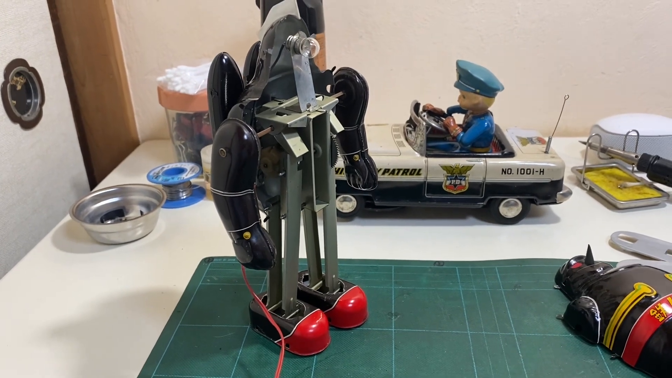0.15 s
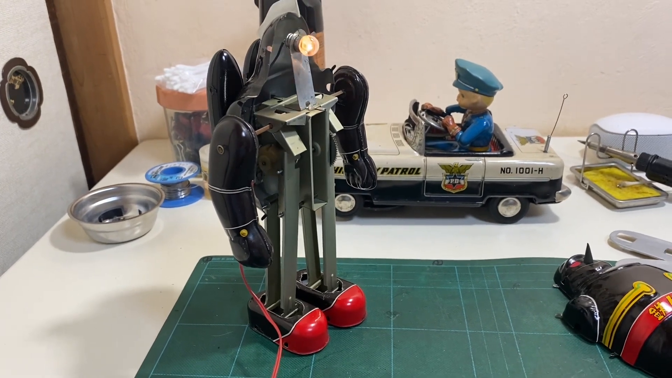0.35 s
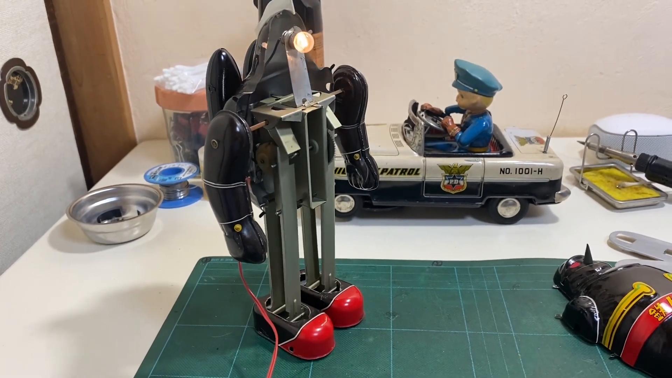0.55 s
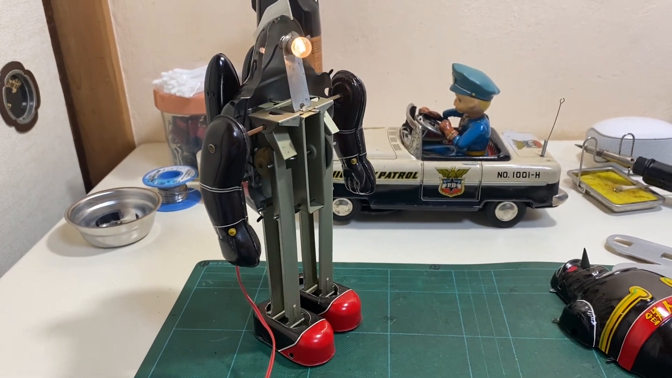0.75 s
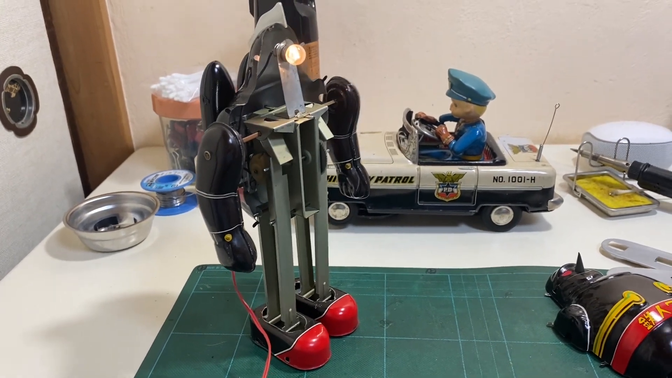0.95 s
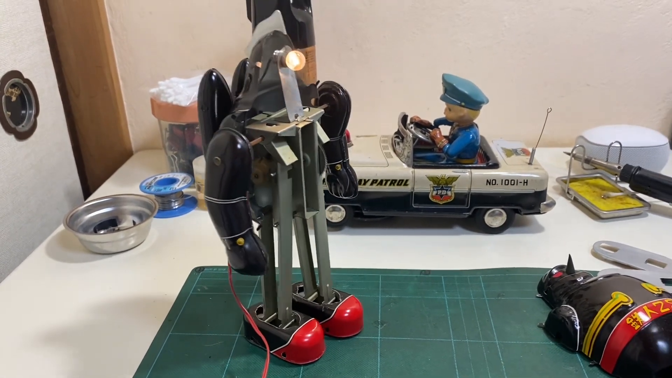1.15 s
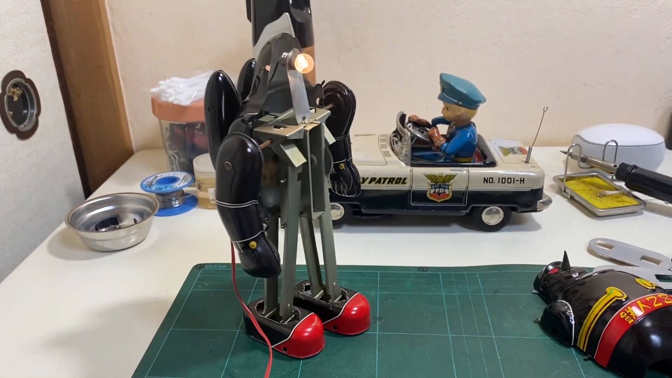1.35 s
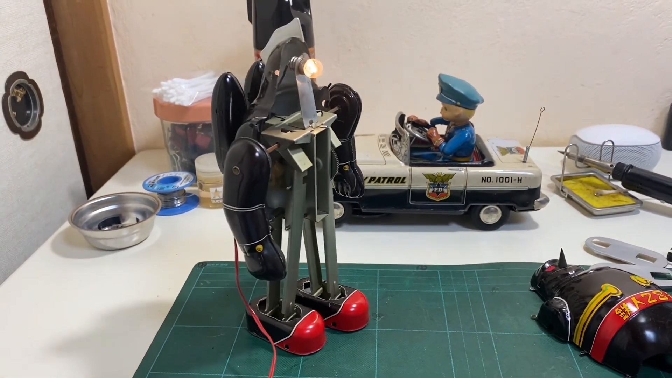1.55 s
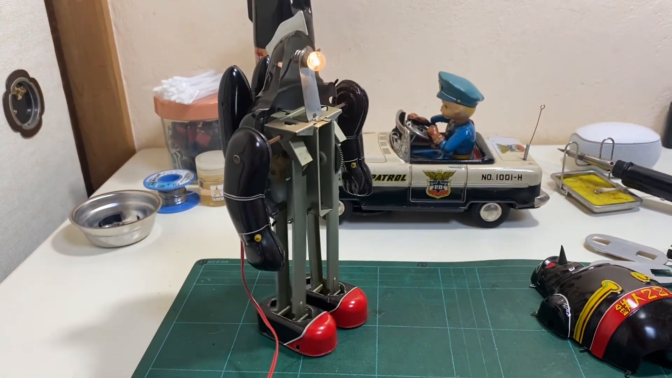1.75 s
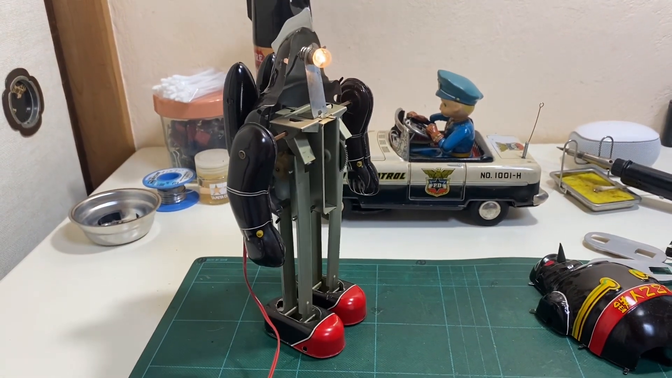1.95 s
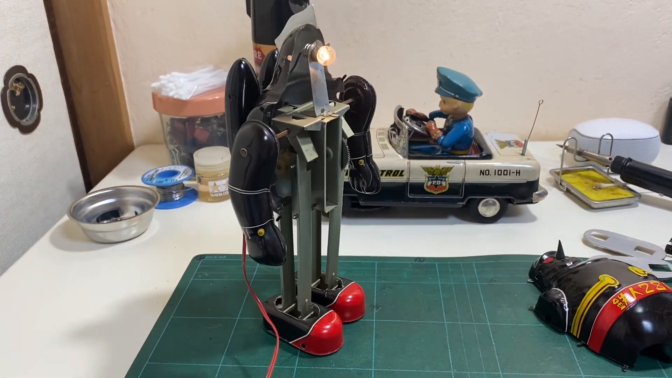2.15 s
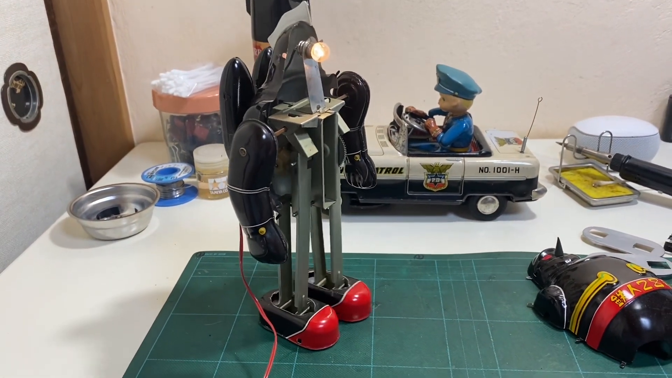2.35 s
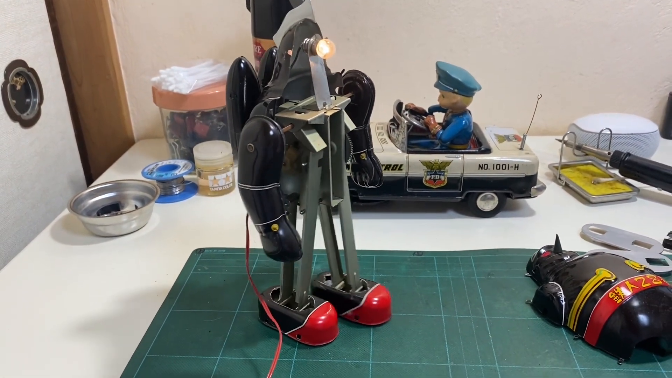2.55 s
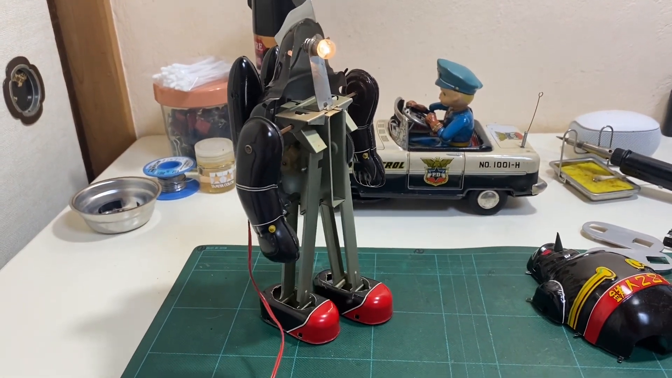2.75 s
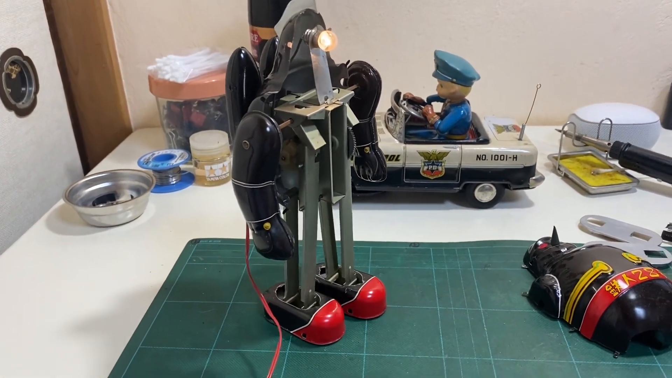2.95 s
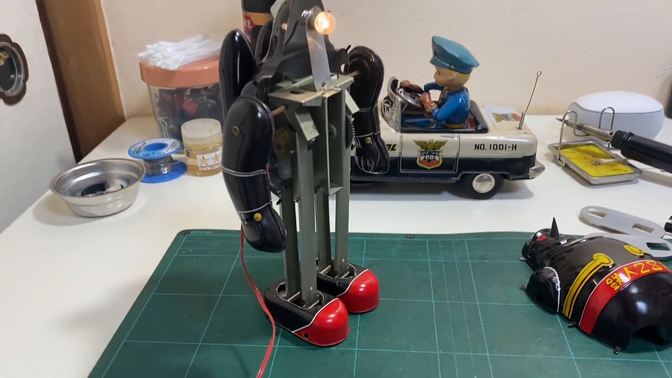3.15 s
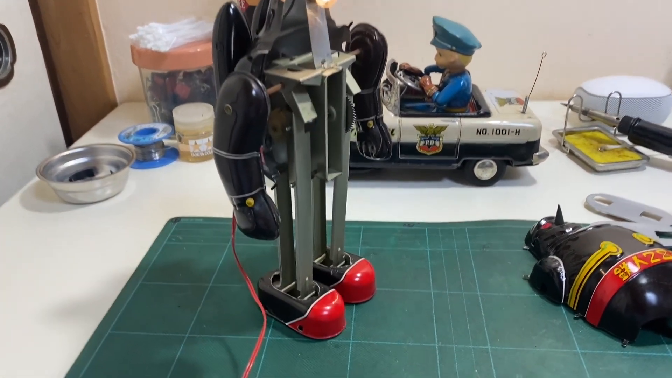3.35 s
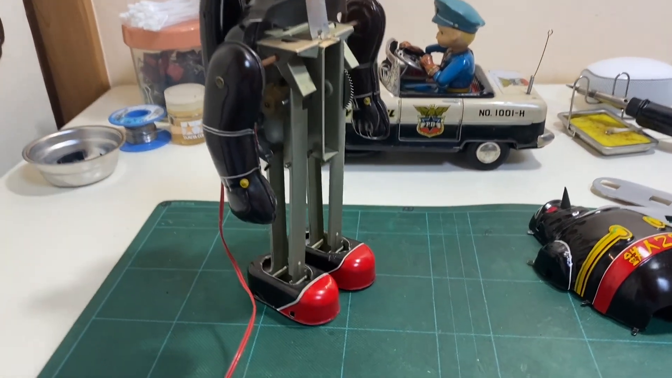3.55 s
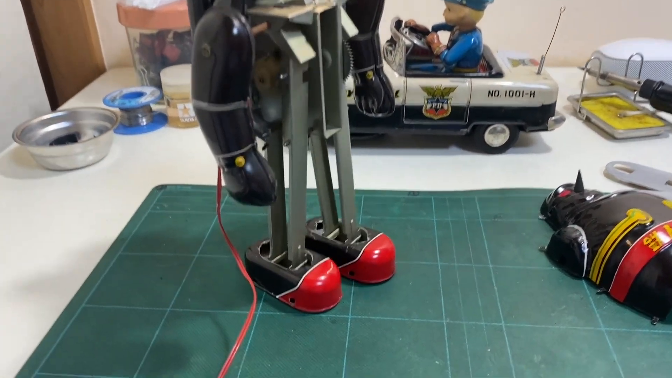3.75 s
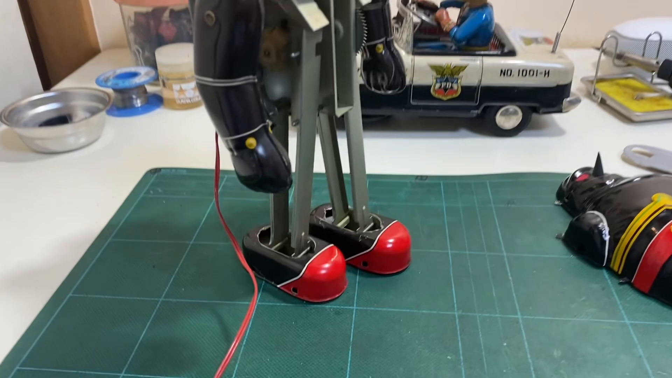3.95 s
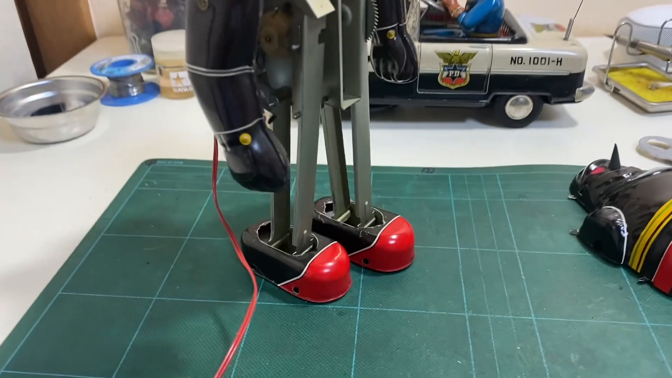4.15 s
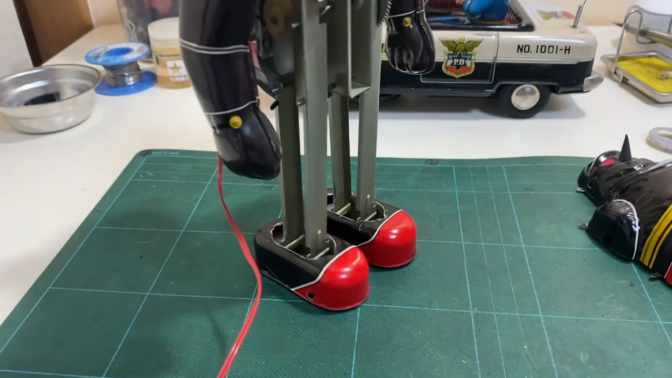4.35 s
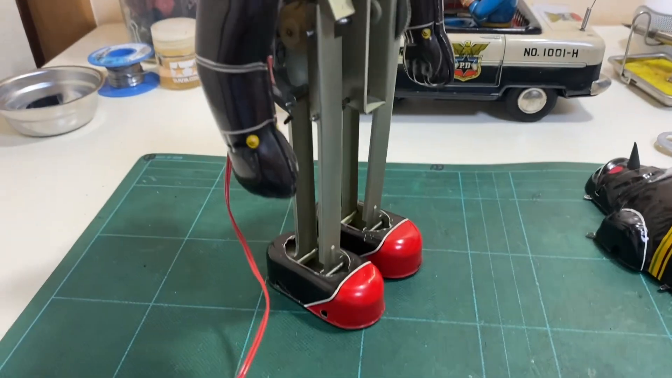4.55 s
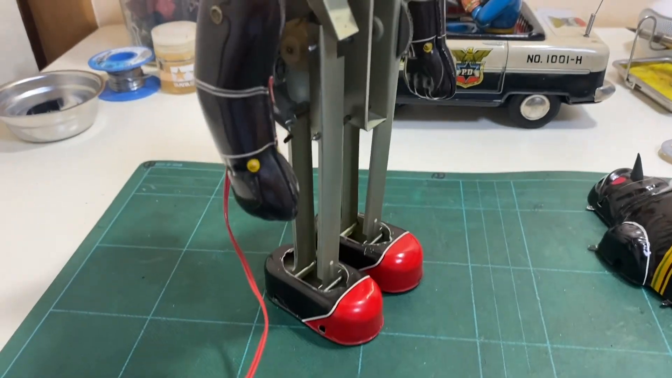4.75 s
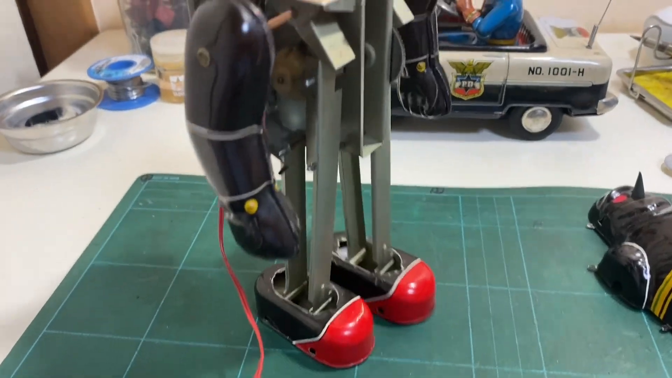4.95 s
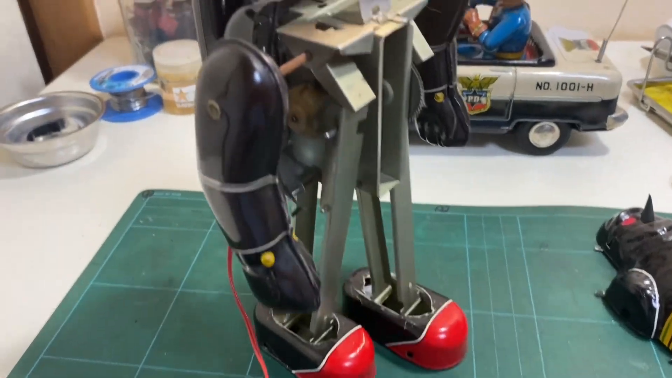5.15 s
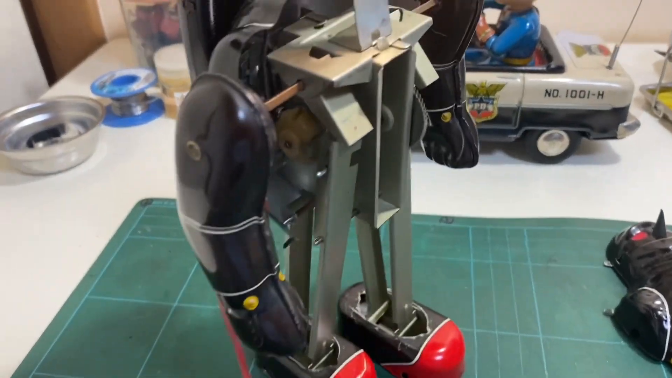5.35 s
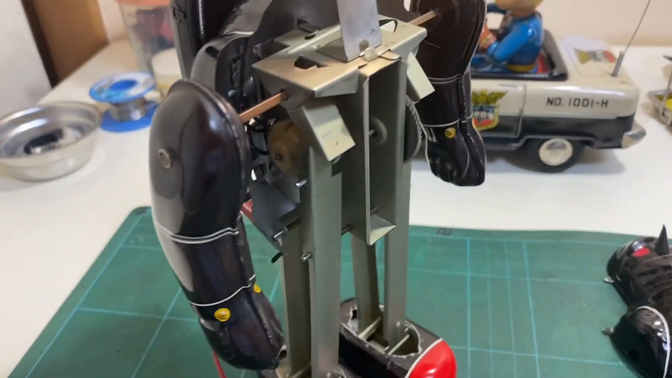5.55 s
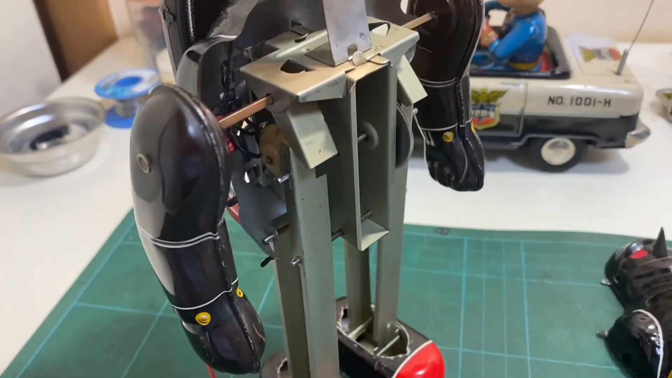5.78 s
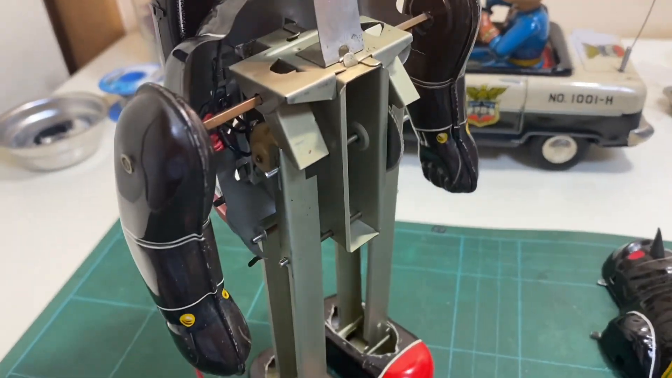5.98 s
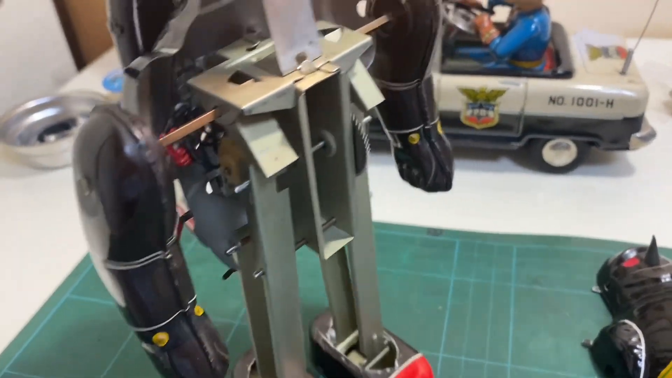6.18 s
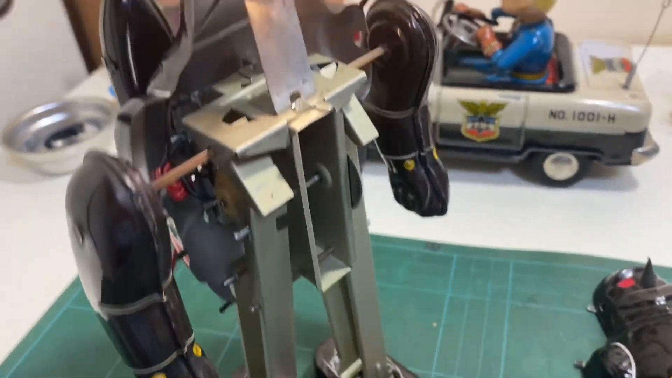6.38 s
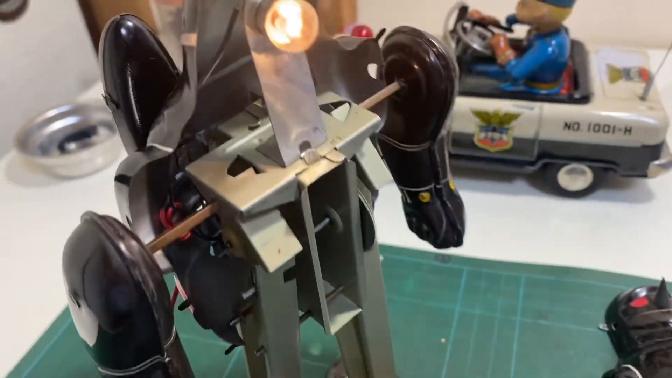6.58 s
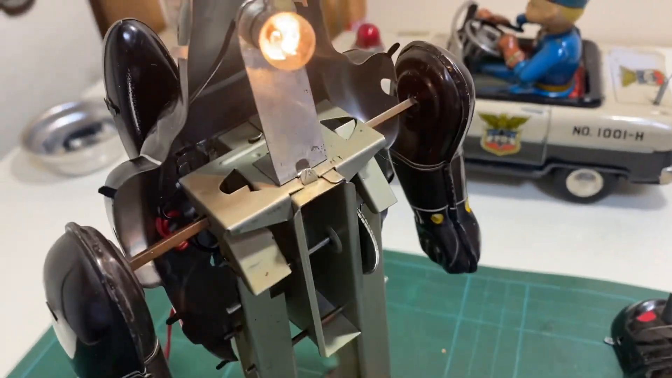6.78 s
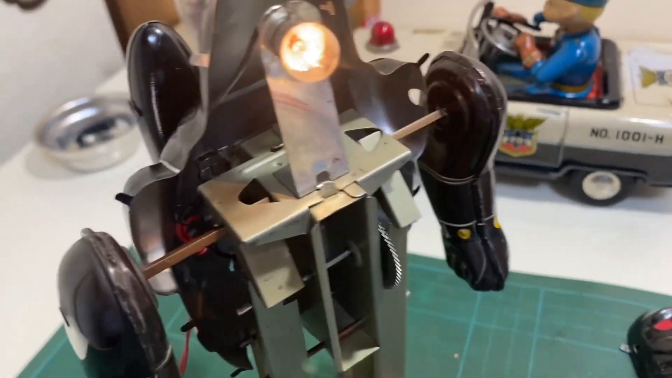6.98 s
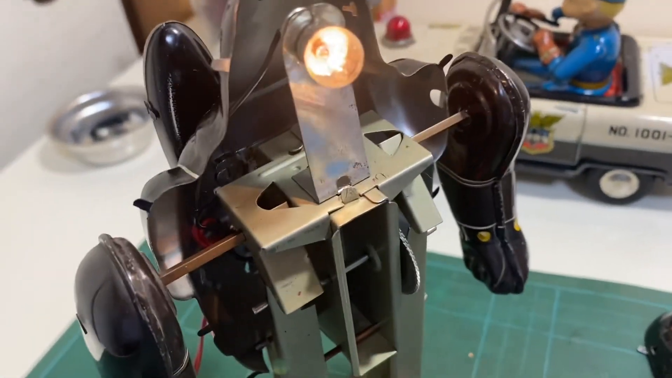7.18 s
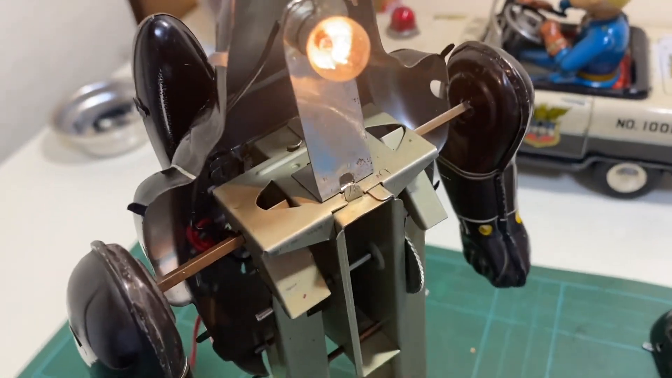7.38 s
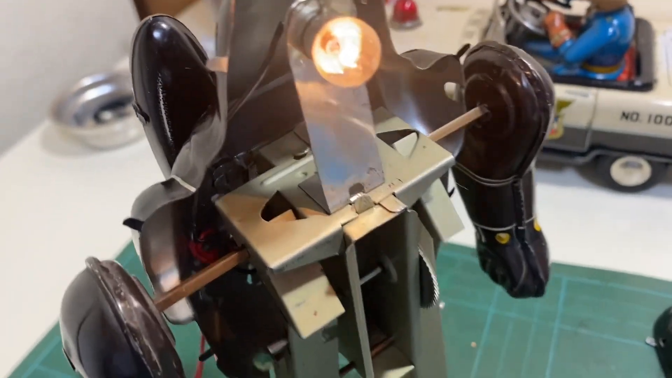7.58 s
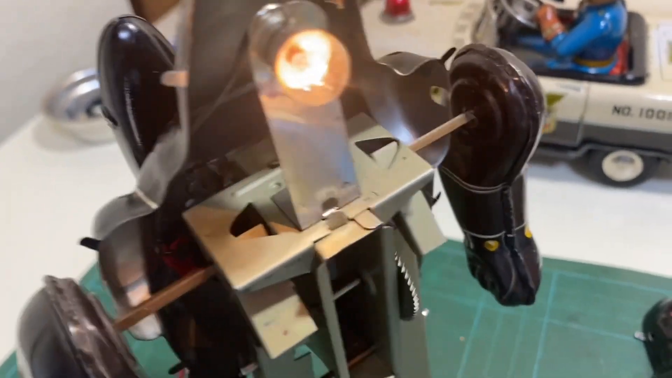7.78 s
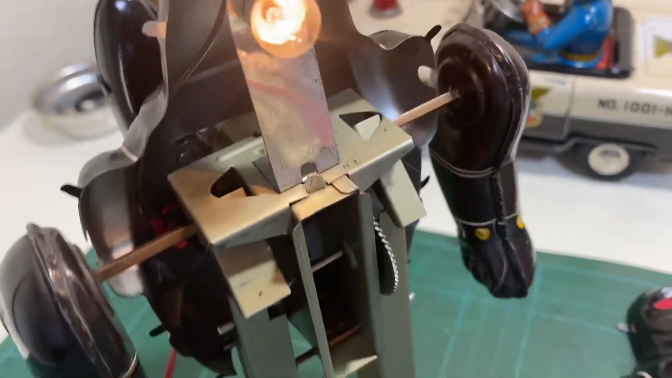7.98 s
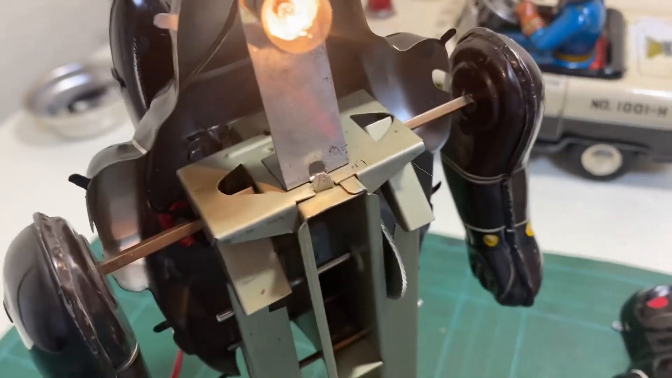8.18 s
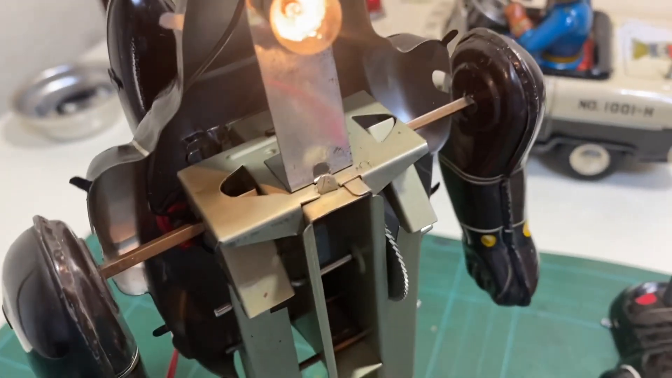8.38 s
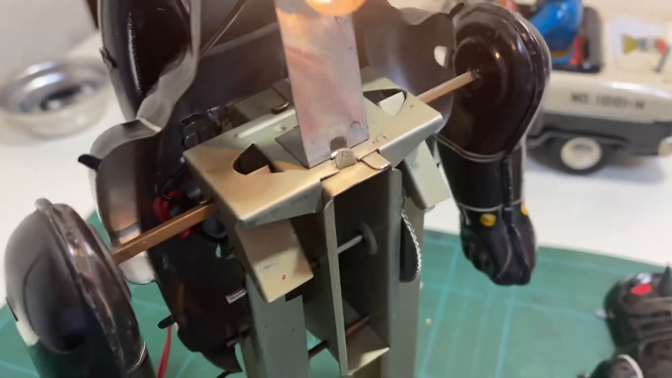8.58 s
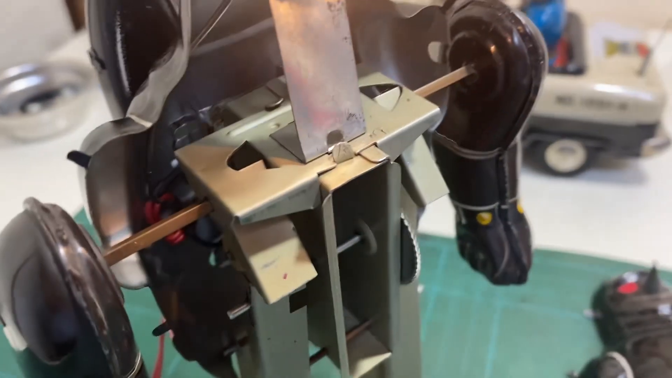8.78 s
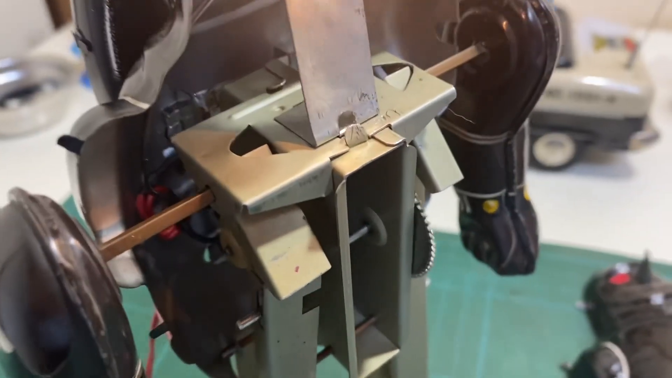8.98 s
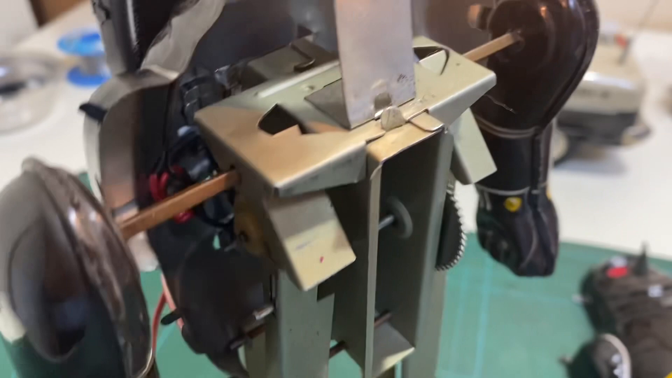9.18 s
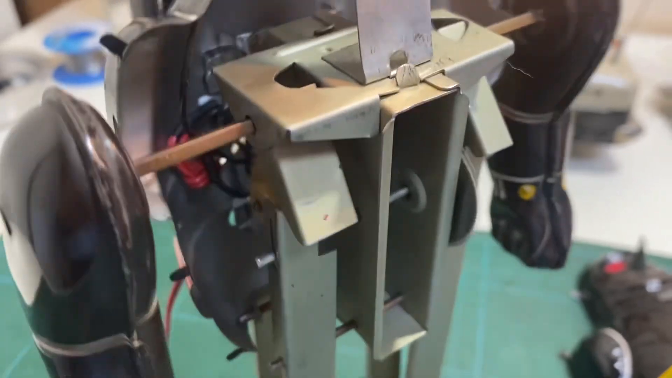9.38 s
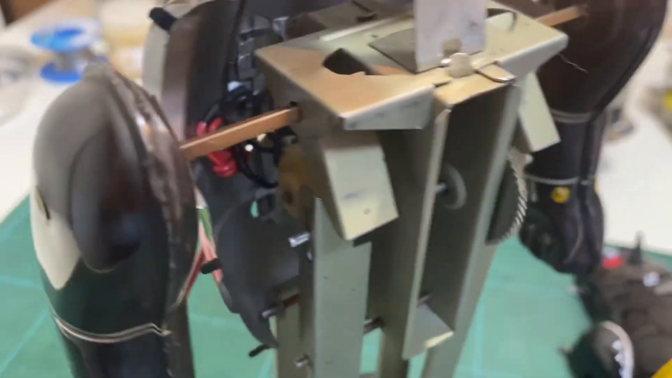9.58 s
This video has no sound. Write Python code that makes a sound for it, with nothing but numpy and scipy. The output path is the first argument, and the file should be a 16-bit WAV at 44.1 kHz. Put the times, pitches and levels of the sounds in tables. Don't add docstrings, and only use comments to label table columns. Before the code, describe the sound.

In a quiet room, a small switch clicks and a tin walking toy starts almost at once. A dense, bright gear rattle runs without pause, pulsing quickly several times a second, with irregular harder knocks and a faint thin metallic ring. A hand-held stereo phone moves nearer, so the chatter grows louder and crisper, over low handling rumble.

```python
import sys
import numpy as np
from scipy import signal
from scipy.fft import rfft, irfft, next_fast_len
from scipy.io import wavfile
from scipy.ndimage import uniform_filter1d

SR = 44100
rng = np.random.default_rng(int(sys.argv[2]) if len(sys.argv) > 2 else 0)


def transcribe(signal):
    frames = np.atleast_2d(signal).T
    limited = np.clip(frames, -1, 1)
    pcm = np.round(limited * 32767).astype(np.int16)
    wavfile.write(sys.argv[1], SR, pcm)


def volts(x):
    e = np.asarray(x, float) / 20
    return 10 ** e


N = 424683


# (time [s], treble excess [dB], plate level over the chatter [dB])
NEARNESS = [(.2, -23, -11), (.3, -6.5, -18), (.45, 0.5, -22), (2, 1, -19.5), (3, -1, -17.5), (4, 0, -21),
            (4.6, .5, -15), (5.8, 1.5, -11), (7, 1, -13.5), (8.2, 0, -13.5), (9.63, 2, -12.5)]


def chatter():
    turn = np.cumsum(motor_hz()) / SR
    slack_pole = np.exp(-2 * np.pi * 60 / SR)
    slack = evened(signal.lfilter([1], [1, -slack_pole], rng.standard_normal(N)))
    beat_db = 3.6 * np.cos(np.pi * turn) ** 4 + 1.15 * np.cos(2 * np.pi * teeth()) + 1.94 * slack

    contacts_per_s = 7000
    struck = rng.random(N) < contacts_per_s / SR
    size = volts(1.6 * np.minimum(rng.exponential(1, N), 4)) * struck
    contacts = evened(size) * rng.choice([-1., 1.], (3, N))
    rub = 0.57 * rng.standard_normal((3, N))
    running = np.arange(N) > LOAD[0][0] * SR
    gears = evened((contacts + rub) * volts(beat_db)) * running

    treble_db = curves(NEARNESS)[0] + 0.65 * np.clip(surge_db(), -8, 8)
    return brightened(gears * volts(load_db() + 0.01), treble_db)


# (time [s], level [dB])
LOAD = [(.19, -87), (.222, -56), (.236, -44.5), (.29, -47), (.315, -38.5), (1, -34), (2, -36), (3, -36),
        (3.8, -35), (4.3, -33.5), (5, -32.5), (6, -33), (6.5, -31.5), (7.2, -31.5), (7.8, -30.5),
        (8.5, -29.5), (9.1, -28.5), (9.63, -31)]
# (time [s], extra level [dB], length [s])
HEAVES = [(0.382, 5.0, 0.097), (0.563, 7, 0.056), (0.704, 3.5, 0.082), (0.939, 2, 0.035), (1.641, 4, 0.1),
          (1.814, 4.5, 0.067), (1.972, 3, 0.022), (2.544, 2, 0.033), (2.694, 3.0, 0.092),
          (2.869, 4.5, 0.051), (3.046, 5, 0.066), (3.214, 4.5, 0.055), (3.621, 3.5, 0.095),
          (3.753, 3, 0.058), (4.124, 2.5, 0.11), (4.283, 5.5, 0.064), (4.445, 4, 0.054),
          (5.327, 3.5, 0.084), (5.503, 4.7, 0.064), (5.684, 4, 0.088), (5.971, 1.5, 0.036),
          (6.056, 2, 0.072), (6.735, 3.5, 0.063), (6.876, 6.5, 0.052), (7.759, 3.3, 0.101),
          (7.914, 5.5, 0.074), (8.097, 5, 0.071), (9.136, 2.5, 0.076), (9.289, 2.5, 0.089),
          (9.471, 2.5, 0.069)]
CRANK_DB = 0.96


def load_db():
    return curves(LOAD)[0] + CRANK_DB * np.cos(2 * np.pi * crank()) + humps(HEAVES)


def surge_db():
    db = load_db()
    return db - uniform_filter1d(db, size=SR // 3)


CRANK_S, CRANK_HZ, CRANK_GAIN_HZ_PER_S = .395, 5.608, .026


def crank():
    t = np.arange(N) / SR - CRANK_S
    return CRANK_HZ * t + CRANK_GAIN_HZ_PER_S * t ** 2 / 2


TEETH_PER_CRANK, TOOTH_PHASE, MOTOR_PER_CRANK = 6, -.33, 31.7


def teeth():
    return TEETH_PER_CRANK * crank() + TOOTH_PHASE


SAG_PER_DB = .004
SPIN_UP_S = .09


def motor_hz():
    since = np.maximum(np.arange(N) / SR - LOAD[0][0], 0)
    geared_hz = MOTOR_PER_CRANK * np.gradient(crank()) * SR
    spin_up = 1 - np.exp(-since / SPIN_UP_S)
    sag = 1 - SAG_PER_DB * np.clip(surge_db(), -6, 6)
    return geared_hz * spin_up * sag


# (time [s], peak level [dB], treble excess [dB])
KNOCKS = [(0.3824, -10, -11), (0.5155, -18, -4), (0.6898, -15, -6), (0.9266, -16, -16), (1.0942, -11, -12),
          (1.7903, -12, -7), (1.9643, -14, -9), (2.5292, -12.5, -13), (2.8539, -14, -14), (3.208, -15, -16),
          (3.5598, -14.5, -5.5), (3.9389, -13.5, -12), (4.434, -11.5, -7), (4.8194, -14.5, -8),
          (4.997, -12.5, -12), (5.3123, -5.5, -15), (5.6625, -11, -12), (6.3876, -14.5, -6),
          (6.6982, -9, -9), (6.8673, -6.5, -8.5), (7.2474, -17, -16), (7.9044, -12, -9), (8.077, -9.5, -10),
          (8.4352, -17, -14), (8.9361, -13, -16), (9.0004, -10, -13), (9.1067, -8, -10), (9.269, -11, -17),
          (9.424, -12, -11), (9.5342, -16, -14)]


def knocks():
    rows = KNOCKS + loose()
    out = np.zeros((3, N))
    t = np.arange(900) / SR
    envelope = (1 - np.exp(-t / .0018)) ** 2 * np.exp(-t / 0.0022)
    bursts = rng.standard_normal((len(rows), 3, len(t))) * envelope
    bursts /= np.linalg.norm(bursts, axis=2, keepdims=True)
    for (s, db, treble_db), burst in zip(rows, bursts):
        at = round(s * SR) - 40
        knock = volts(db + 6.5) * brightened(burst, 0.85 * (treble_db + 17.0))
        out[:, at:at + len(t)] += knock[:, :N - at]
    light_parts = signal.butter(N=1, Wn=900., btype="high", fs=SR, output="sos")
    return signal.sosfilt(light_parts, out)


LOOSE_SHARE, LOOSE_SCATTER_S = .75, .008
LOOSE_DB, LOOSE_SPREAD_DB = 12, 2.5
LOOSE_TREBLE_DB, LOOSE_TREBLE_SPREAD_DB = -12, 4


def loose():
    at = np.searchsorted(teeth(), np.arange(3, 315))
    luck = rng.random(len(at))
    late, size, edge = rng.standard_normal((len(at), 3)).T
    s = at / SR + LOOSE_SCATTER_S * late
    db = load_db()[np.minimum(at, N - 1)] + LOOSE_DB + LOOSE_SPREAD_DB * np.clip(size, -2, 1)
    treble_db = LOOSE_TREBLE_DB + LOOSE_TREBLE_SPREAD_DB * edge
    rows = np.transpose([s, db, treble_db])
    return [*rows[(luck < LOOSE_SHARE) & (at < N - 1000)]]


# (frequency [Hz], width [Hz], level from far, nearer, low beside,
# close above [dB])
TIN = [(375, 108, -11, -12, -16, -9), (527, 68, -11, -9.5, -9.5, -9), (678, 81, -11, -16, -20, -16.5),
       (1085, 115, -9, -5.5, -8, -31), (1220, 61, -3, -1.5, -24, -8), (1546, 96, -8, -9, 3.5, 0),
       (1673, 84, 0.5, 0, 4.5, 3.5), (2055, 130, 4, 3.5, 8, 2.5), (2304, 150, 4, 2.5, -3, -8),
       (2592, 350, 7.5, 6, 5, 2), (3065, 113, 6.5, 0.5, 1.5, 0.5), (3328, 280, 7, 3, 1, 2.5),
       (3690, 150, -10, -4, 3, -9),
       (4048, 420, -0.5, 1, -12, 5), (5200, 620, -5, -6, 4.0, -21), (5860, 770, 0, -3, -1.5, 3.5),
           (6930, 570, -9, -2, -0.5, -0.5), (8230, 450, 1, 3.5, 2.5, 1), (8460, 700, -0.5, 3, 2, 1),
           (9050, 380, -11, -11.0, 5.5, 3.5), (9780, 220, -1.5, 1, -6, 3.5),
           (10580, 780, -1.5, -1.5, -0.5, -1), (11150, 490, -24.0, -7.0, 3.5, -1),
           (11900, 310, 1, 2, -2.0, -4), (12500, 230, 2, 4, 6, 2.5), (14700, 1300, -25.0, -17, -4, -3.5),
           (15900, 600, -3, -6, -2, -7)]
# (frequency [Hz], level [dB])
BETWEEN = [(150, -27), (300, -22), (800, -20.5), (1800, -6), (3800, -2), (4700, -2.5), (5500, -4),
           (7400, -4.5), (10000, -4), (13000, -2.5)]
VALLEY_DB = [-1.1, 0.3, 0.8, -1]


def frame_colour(view, grid):
    power = volts(2 * (read(BETWEEN, grid) + VALLEY_DB[view]))
    for mode in TIN:
        hz, width = mode[:2]
        power += volts(2 * mode[2 + view]) / (1 + (2 * (grid - hz) / width) ** 2) ** 1.385
    middle = (grid > 2000) & (grid < 8000)
    return power / (power[middle].mean() * 6000 / (SR / 2))


def smear(hz, feedback=.5):
    delays = rng.uniform(.0008, .007, (4, 2, 1))
    back = np.exp(-2j * np.pi * hz * delays)
    return np.prod((back - feedback) / (1 - feedback * back), axis=0)


VIEWS_S = [1.8, 3.6, 5.2, 6.8]
# (frequency [Hz], left over right from the four places [dB])
BALANCE_DB = [(80, 0, 3, 0, 1), (400, 1, 1, -2, 3.5), (1050, 5, 7.5, 8.5, 12.8), (1470, -6, 1, 5, 6.4),
              (2170, 7, 5.5, 3, 4.7), (2760, 2.5, 3.5, 7, 7.2), (3720, 6.5, 2.5, 1, 5.4),
              (4600, 9, 6.5, 7.5, 2.3), (5730, 3, 4, 0, 7.3), (6570, 7, 5, 4, .2), (8000, 0.5, 0, 0, 1)]
# (frequency [Hz], lead [half turns])
LEAD = [(0, 0), (1500, .3), (2500, .2), (4600, .06), (5600, -.4), (6300, 0), (6900, 0), (8950, -1),
        (11000, -2), (13200, -3), (15000, -4), (16000, -4.1)]
# (frequency [Hz], share of the power from the four places [0..1])
ECHO = [(100, .05, .05, .05, .05), (300, 0.16, .15, .15, 0.12), (900, 0.48, 0.38, 0.41, 0.55),
        (2030, 0.22, 0.29, 0.36, 0.34), (3960, 0.29, 0.4, 0.48, 0.072), (5160, 0.96, 0.66, 0.51, 0.53),
        (6440, .3, 0.22, 0.094, .04), (8640, .08, 0.098, 0.068, 0.069)]


def heard(x):
    size = next_fast_len(N + SR // 2)
    hz = np.fft.rfftfreq(size, 1 / SR)
    grid = np.fft.rfftfreq(16384, 1 / SR)
    lead = np.exp(.5j * np.pi * np.interp(hz, *np.transpose(LEAD)) * np.array([[1], [-1]]))
    echoes = smear(hz)
    out = 0
    for view in range(len(VIEWS_S)):
        place = np.interp(np.arange(N) / SR, VIEWS_S, np.eye(len(VIEWS_S))[view]) ** 0.79
        body = rfft(causal(10 * np.log10(frame_colour(view, grid))), size)
        share = np.clip(read(ECHO, hz, column=1 + view), 0, 1)
        ports = volts(read(BALANCE_DB, hz, column=1 + view) * np.array([[.5], [-.5]]))
        z = rfft(x * place, size)
        direct = np.sqrt(1 - share) * lead * z[0]
        scattered = np.sqrt(share) * echoes * z[1:]
        out = out + body * ports * (direct + scattered)
    return irfft(out, size)[:, :N]


def shifting(x, panels_db=2.1, patches_db=1.0):
    z = signal.stft(x, SR, nperseg=1024, noverlap=768)[2]
    a, b = rng.standard_normal((2,) + z.shape[1:])
    panels = evened(uniform_filter1d(uniform_filter1d(a, size=40, axis=1), size=40, axis=1))
    patches = evened(uniform_filter1d(uniform_filter1d(b, size=12, axis=1), size=16, axis=0))
    gain = volts(panels_db * panels + patches_db * patches)
    return signal.istft(z * evened(gain), SR, nperseg=1024, noverlap=768)[1][:, :N]


# (frequency [Hz], width [Hz])
PLATE = (1496, 16)


def plate():
    hz, width = PLATE
    real, imaginary = rng.standard_normal((2, N))
    swing = signal.lfilter([1], [1, -np.exp(-np.pi * width / SR)], real + 1j * imaginary)
    ring = evened((swing * np.exp(2j * np.pi * hz * np.arange(N) / SR)).real)
    level_db = load_db() + 0.052 * surge_db() + curves(NEARNESS)[1]
    lagging_db = np.roll(level_db, 400)
    return ring * volts(lagging_db) * (np.arange(N) > .23 * SR)


# (time [s], level [dB], frequency [Hz], decay by 60 dB [s])
TAPS = [
    (.2088, -36, 2400, .015),
    (.234, -37, 2340, 0.11),
    (.69, -42, 780, 0.059),
    (.69, -45, 479, 0.073),
    (4.436, -38, 1110, .06),
    (5.68, -49, 300, .06),
]


def taps():
    out = np.zeros(N)
    t = np.arange(SR // 5) / SR
    for s, db, hz, t60 in TAPS:
        envelope = volts(db - 60 * t / t60) * (1 - np.exp(-t / 0.0013))
        out[round(s * SR):][:len(t)] += envelope * np.sin(2 * np.pi * hz * t)
    return out


# (time [s], level [dB])
MOTOR = [(.2, -95), (.3, -80), (.45, -69), (1, -64), (2, -66), (3, -64), (4.2, -64.5), (4.4, -75),
         (5.5, -70.5), (6.4, -60), (7.05, -71), (7.7, -60.5), (7.95, -74), (8.3, -71), (8.6, -60),
         (9.1, -62.5), (9.3, -70), (9.63, -69)]
# (time [s], level [dB])
UPPER_HUM = [(.2, -95), (.45, -65), (5, -66), (9.63, -63)]
# (multiple of motor speed, level [dB])
ORDERS_DB = [(1, 0), (2, -4), (3, -2.5), (4, -9.5)]


def hum():
    wobble = uniform_filter1d(rng.standard_normal((len(ORDERS_DB) + 1, N)), size=4000)
    wobble = evened(uniform_filter1d(wobble, size=2000))
    turn = np.cumsum(motor_hz() * (1 + 0.00407 * wobble[-1])) / SR
    first_db, upper_db = curves(MOTOR)[0], curves(UPPER_HUM)[0]
    out = np.zeros(N)
    for (k, db), swell in zip(ORDERS_DB, wobble):
        path_db = upper_db if k > 1 else first_db
        out += volts(path_db + db + 2.5 + 2.4 * swell) * np.sin(2 * np.pi * k * turn + k)
    return out


# (time [s], level [dB])
RUMBLE = [(0, -69.5), (.2, -68.5), (.9, -61.5), (4.4, -60), (5.3, -67), (6.2, -61), (7.2, -63.5),
          (9.63, -65.5)]
# (frequency [Hz], level [dB])
RUMBLE_HZ = [(20, -30), (40, -11.5), (60, 2), (100, -4.5), (150, -7), (250, -12.5), (500, -25.5),
             (1000, -30), (4000, -41), (8000, -37), (16000, -50)]
# (time [s], extra level [dB], length [s])
GRIPS = [
    (1.25, 8, 0.18),
    (3.67, 2, .15),
    (4.7, -10, 0.14),
    (5.77, 5, 0.17),
    (8.86, 13, 0.071),
    (9.02, -7, .1),
    (9.25, 13, 0.19),
    (9.5, 11, .2),
]


def rumble():
    hz = np.fft.rfftfreq(N, 1 / SR)
    mid, side = rfft(rng.standard_normal((2, N))) * volts(read(RUMBLE_HZ, hz))
    side = side * np.clip(hz / 450, .12, .6)
    return evened(irfft([mid + side, mid - side], N)) * volts(curves(RUMBLE)[0] + humps(GRIPS))


def evened(x):
    return x / np.sqrt(np.mean(x ** 2) + 1e-20)


def curves(rows):
    s, *columns = np.transpose(rows)
    return [np.interp(np.arange(N) / SR, s, c) for c in columns]


def humps(rows):
    t = np.arange(0, N, 64) / SR
    db = sum(h * np.exp(-np.log(16) * ((t - s) / length) ** 2) for s, h, length in rows)
    return np.interp(np.arange(N) / SR, t, db)


def read(rows, hz, column=1):
    rows = np.array(rows)
    return np.interp(np.log(hz + 1), np.log(rows[:, 0]), rows[:, column])


def causal(db):
    log_gain = np.log(volts(np.concatenate([db, db[-2:0:-1]])))
    return np.fft.ifft(np.exp(log_gain - 1j * signal.hilbert(log_gain).imag)).real[:4096]


def brightened(x, treble_db, edge_hz=8300):
    high = signal.sosfilt(signal.butter(N=1, Wn=edge_hz, btype="high", fs=SR, output="sos"), x)
    return x + (volts(treble_db) - 1) * high


def scene():
    ring = plate() + taps()
    late = np.pad(ring, (5, 0))[:N]
    ring_ports = np.array([volts(5.0) * ring, volts(-3.5) * late])
    gears = shifting(heard(chatter() + knocks()))
    return gears + ring_ports + hum() * volts([[.5], [-.5]]) + rumble()


def top_cut(x):
    return signal.sosfilt(signal.butter(12, 16010, fs=SR, output="sos"), x)


def record(dry):
    return top_cut(dry)


dry = scene()
out = record(dry)
transcribe(out)
```